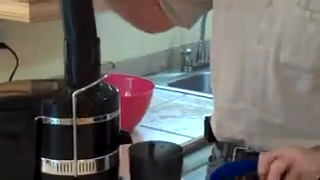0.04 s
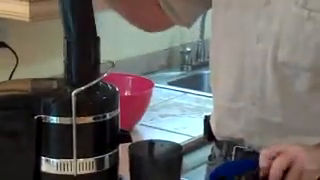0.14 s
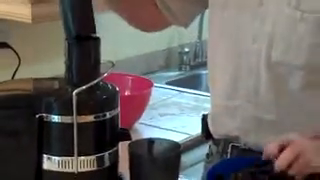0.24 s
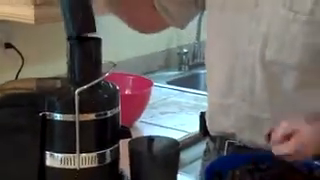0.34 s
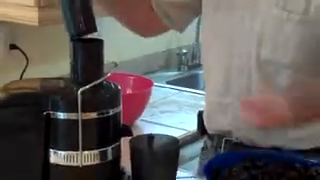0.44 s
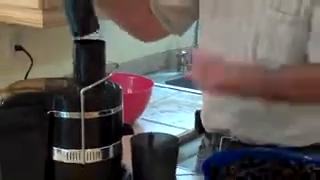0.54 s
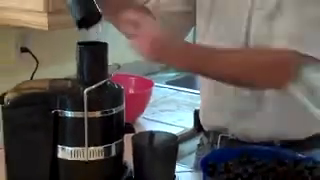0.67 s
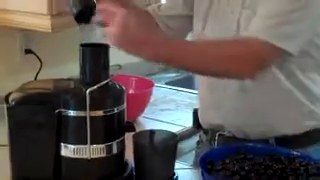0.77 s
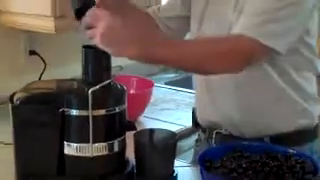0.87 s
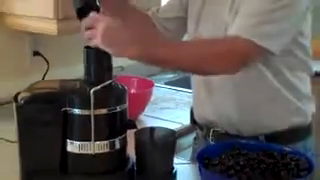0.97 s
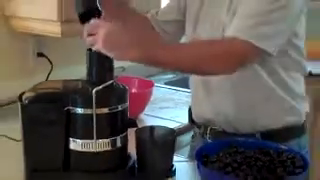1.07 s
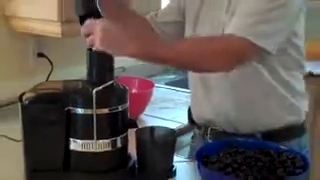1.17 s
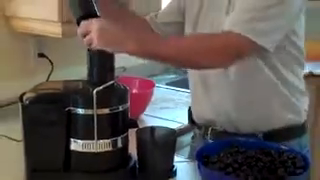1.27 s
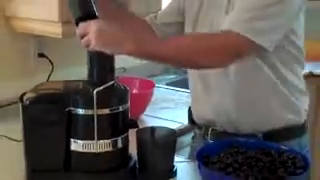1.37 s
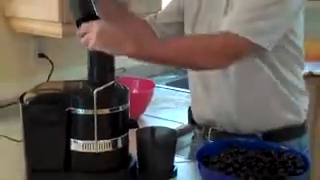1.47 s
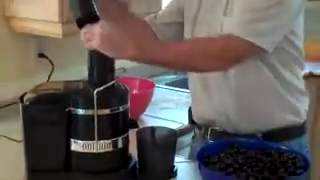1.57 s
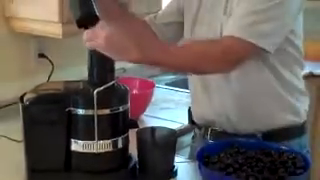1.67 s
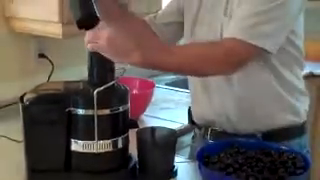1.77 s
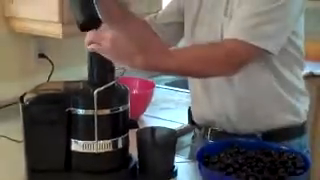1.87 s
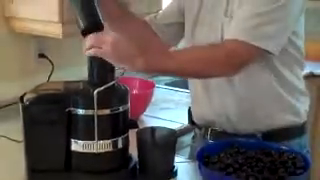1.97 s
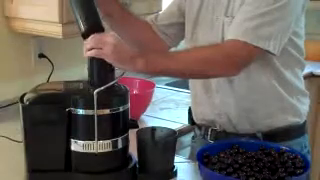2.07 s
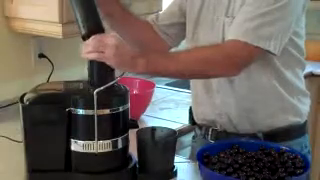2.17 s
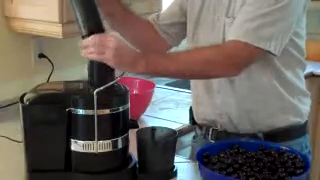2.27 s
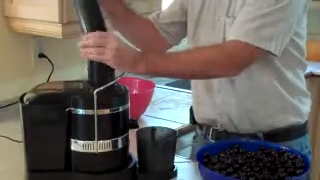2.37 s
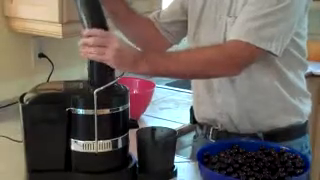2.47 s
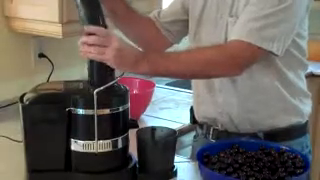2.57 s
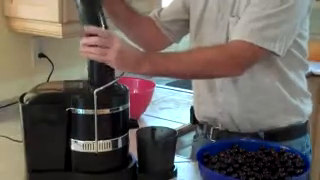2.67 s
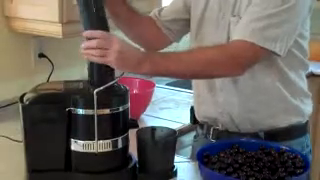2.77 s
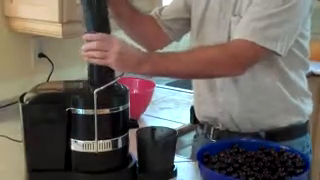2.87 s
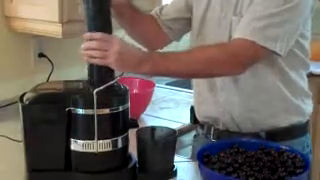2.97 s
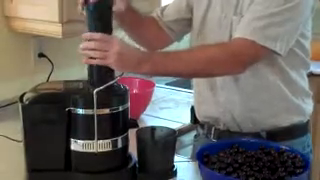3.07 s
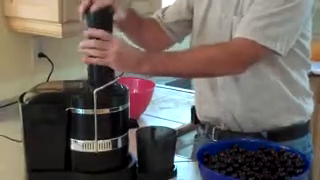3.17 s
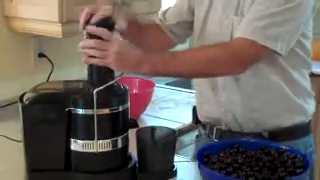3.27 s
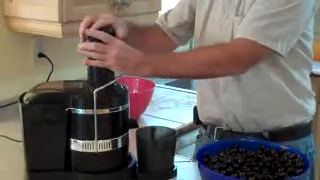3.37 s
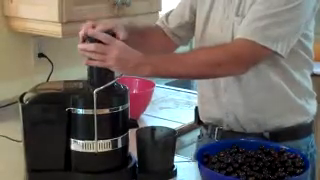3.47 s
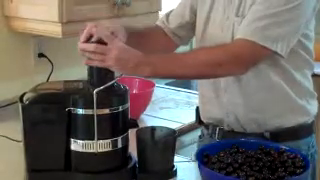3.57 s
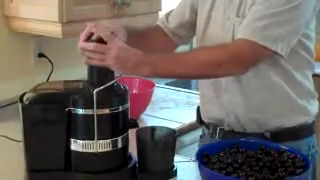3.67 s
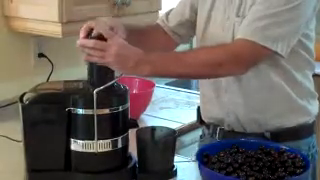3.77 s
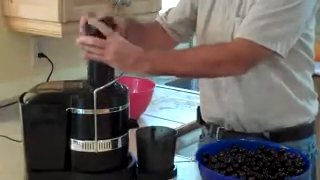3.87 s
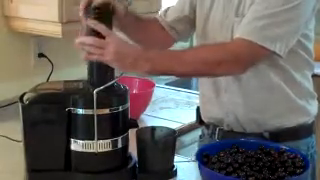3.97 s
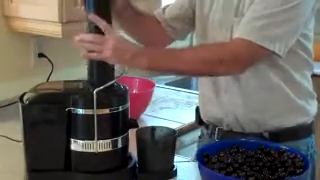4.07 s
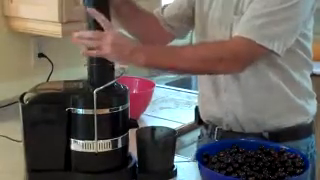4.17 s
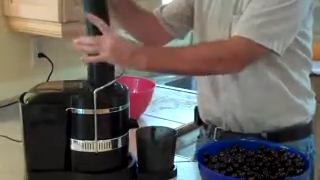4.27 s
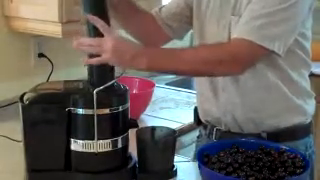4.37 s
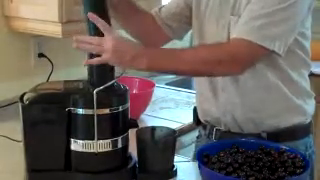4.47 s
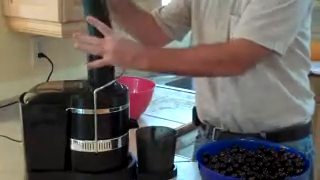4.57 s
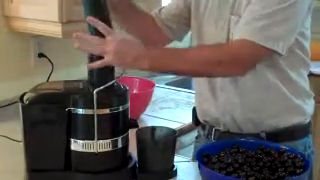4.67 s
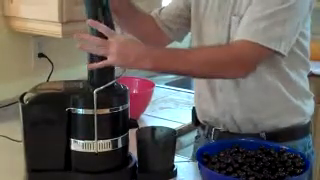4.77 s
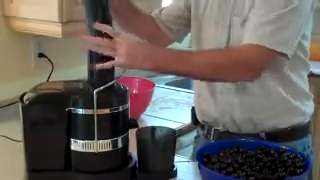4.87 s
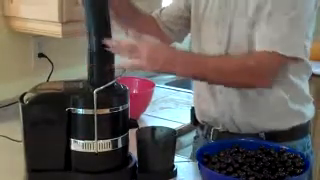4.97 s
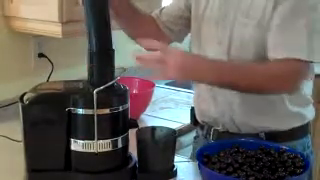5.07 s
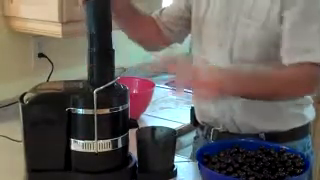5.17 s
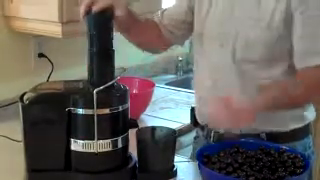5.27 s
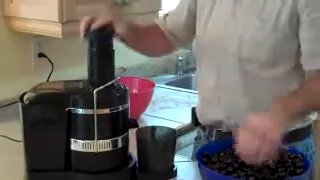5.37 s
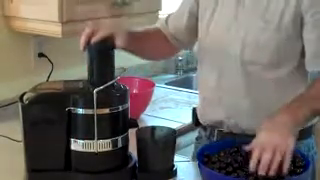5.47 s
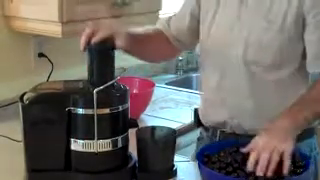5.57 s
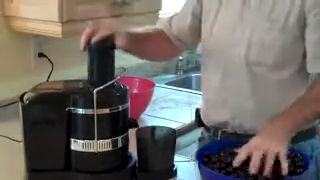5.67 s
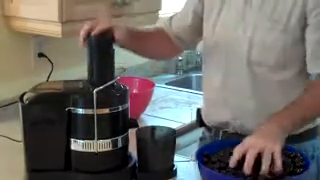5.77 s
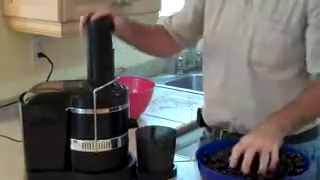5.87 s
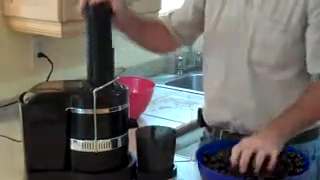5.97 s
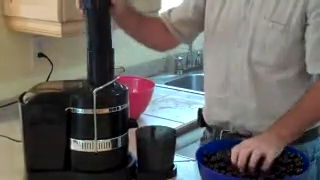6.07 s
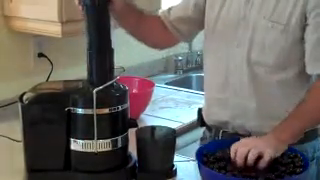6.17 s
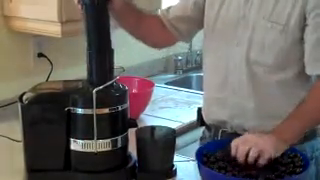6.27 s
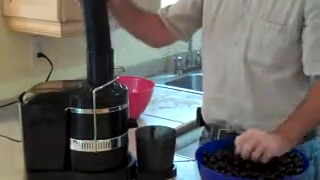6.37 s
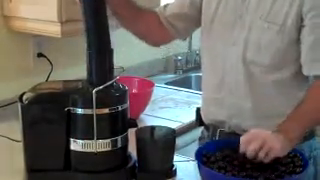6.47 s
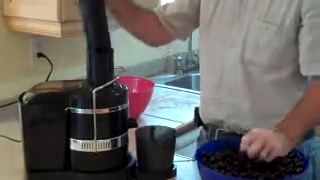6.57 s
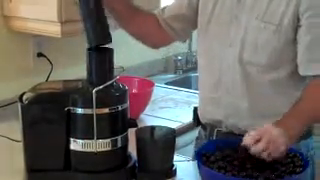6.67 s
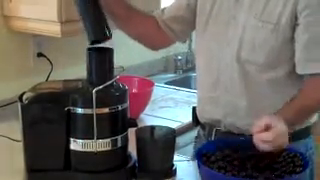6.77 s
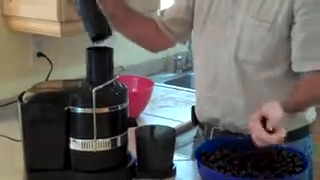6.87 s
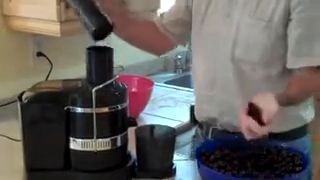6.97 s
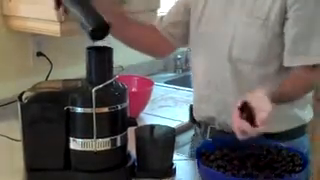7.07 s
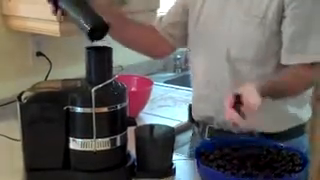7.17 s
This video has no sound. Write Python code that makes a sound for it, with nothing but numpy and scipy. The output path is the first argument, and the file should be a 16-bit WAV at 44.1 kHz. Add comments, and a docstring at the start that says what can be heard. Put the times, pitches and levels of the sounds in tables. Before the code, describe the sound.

An electric juicer hums, whines and hisses steadily while small fruit is pushed down and shredded in wet rasping bursts, with a hard plastic knock afterwards.

```python
"""A centrifugal juicer hums, whines and hisses on a kitchen counter, from sine tones and coloured noise.
Grapes drop down the chute and are shredded in sharp rasps, made of dense clicks that shake the housing.
Wet pulp thuds into the plastic housing as softer clicks, and the pusher knocks ringing modes in the chute.
A camera with two small microphone ports stands close by in the hard room, which adds noise-built echoes."""
import sys
import numpy as np
from scipy import signal
from scipy.fft import rfft, irfft, next_fast_len
from scipy.io import wavfile
from scipy.ndimage import uniform_filter1d

SR = 44100
rng = np.random.default_rng(int(sys.argv[2]) if len(sys.argv) > 2 else 0)


def store_pcm(level_fs):
    """Save levels as 16-bit WAV."""
    pcm = np.round(np.clip(level_fs, -1, 1) * 32767).astype(np.int16)
    wavfile.write(sys.argv[1], SR, np.atleast_2d(pcm).T)


N = 318843

SHAFT_HZ = 59.78  # turns per second without load
T = np.arange(N) / SR  # time in seconds
SIZE = next_fast_len(N + SR)  # room for one second of echoes
HZ = np.maximum(np.arange(SIZE // 2 + 1) * SR / SIZE, 1)


def undb(db):
    """Turn decibels into gain."""
    return 10 ** (np.asarray(db) / 20)


def curve(table):
    """Join the rows of a table by straight lines in time."""
    rows = np.array(table)
    return np.interp(T, rows[:, 0], rows[:, 1])


def across(table, hz):
    """Read a table between its rows, with pitch on a logarithmic axis."""
    rows = np.array(table)
    return np.interp(np.log(hz), np.log(rows[:, 0]), rows[:, 1])


def through(x, response):
    """Filter a sound by a frequency response."""
    return irfft(rfft(x, SIZE) * response, SIZE)[..., :N]


def unit(x):
    """Scale to an average strength (rms) of 1."""
    return x / np.sqrt(np.mean(np.abs(x) ** 2))


def colour(x, spectrum):
    """Give a white sound a spectrum, keeping its power."""
    return through(x, unit(undb(across(spectrum, HZ))))


def walk(rate):
    """Smooth random wandering with rms 1; rate is how many new values are drawn per second."""
    k = int(SR / rate)
    steps = np.repeat(rng.standard_normal(N // k + 1), k)
    smooth = uniform_filter1d(uniform_filter1d(steps, k), k)
    return unit(smooth[:N])


def clicks(rate, spread_db):
    """Dense tiny impacts of uneven size, rate per second on average, scaled to rms 1."""
    struck = rng.random(N) < rate / SR
    direction = np.sign(rng.standard_normal(N))
    size = undb(spread_db * np.clip(rng.standard_normal(N), -2, 2))
    return unit(struck * direction * size)


def later(x, seconds):
    """Delay an envelope."""
    return np.interp(T - seconds, T, x)


def bursts(rows, rise):
    """Envelope of (start s, dB, fall time s) bursts: each rises quickly and dies away exponentially."""
    power = np.zeros(N)
    for s, db, length in rows:
        start = int(s * SR)
        age = T[:min(SR // 2, N - start)]
        shape = (1 - np.exp(-age / rise)) * np.exp(-age / max(length, rise))
        power[start:start + len(age)] += (undb(db) * shape) ** 2
    return np.sqrt(power)


def motor(turns, waver_db=2, flutter_db=1.5, hum_jitter=0.3, whine_jitter=0.1):
    """Shaft harmonics that waver on their own, one strong whine and a thin bearing tone."""
    # Motor hum. Each row: multiple of the shaft speed, average level in dB.
    harmonics = [(1, -71.5), (2, -66.5), (3, -55), (4, -51.5), (5, -59), (6, -57), (8, -68), (10, -57),
                 (11, -62), (13, -61), (14, -62), (16, -60), (17, -57), (25, -75), (30, -58)]
    # The whine dips briefly. Each row: middle of the dip in seconds, depth in dB.
    whine_dips = [(1.13, 7), (3.32, 5), (6.39, 11)]
    dip_s = 0.091
    whine_order, whine_db = 15, -44.5  # multiple of the shaft speed, level outside the dips
    bearing_hz, bearing_db = 2745, -57

    def tone(phase, db, jitter):
        """A sine of rms level db, with a random starting phase that also wanders."""
        cycles = phase + rng.random()
        return np.sqrt(2) * undb(db) * np.sin(2 * np.pi * cycles + jitter * walk(14))

    hum = sum(tone(round(order) * turns, db + waver_db * walk(12), hum_jitter) for order, db in harmonics)
    dips = sum(depth * np.exp(-((T - s) / dip_s) ** 2) for s, depth in whine_dips)
    whine = tone(whine_order * turns, whine_db - dips + flutter_db * walk(12), whine_jitter)
    bearing = tone(bearing_hz * T, bearing_db + flutter_db * walk(4.93), whine_jitter)
    return hum + whine + bearing


def basket(turns, air_db=-37, spray_db=-5.5, throb=0.043):
    """The spinning basket rushes steadily with air, and its fine spray throbs once a turn."""
    # How the spray's hiss changes. Each row: time in seconds, level in dB before spray_db is added.
    hiss = [(0, -33), (1.45, -33.5), (3.4, -36), (4.35, -36.5), (4.7, -32.5), (6.2, -38.5), (6.6, -34),
            (7.2, -33.5)]
    # Tone colour of air and spray. Each row: frequency in Hz, relative level in dB.
    rush_spectrum = [(30, -14.5), (90, -9.5), (150, -8), (200, -4), (250, 5.5), (330, -2.5), (450, -4.5),
                     (620, -2.5), (1000, -2.5), (2000, -3.5), (4900, -5), (6100, 5), (7700, 7), (9500, -7),
                     (12000, -20.5)]
    air = rng.standard_normal(N) * undb(air_db + 0.49 * walk(12))
    spray = clicks(rate=5000, spread_db=4) * undb(curve(hiss) + spray_db + 0.81 * walk(27))
    throbbing = 1 + throb * np.sin(2 * np.pi * turns)
    return colour(air + spray * throbbing, rush_spectrum)


def shredding():
    """How hard the grater disc works: each batch is gripped, wears down steadily and is flung clear."""
    # Batches of fruit on the disc. Each row: start in seconds, length in seconds,
    # shredding level in dB before wear.
    batches = [(1.594, .23, -18), (1.909, 0.39, -22), (2.314, 0.64, -20.5), (3.04, 0.19, -33),
               (3.463, 0.043, -30.5), (4.768, .08, -32), (4.845, 0.053, -26.5), (4.937, 0.051, -28)]
    grip_s, wear_db_per_s, clear_s = 0.023, 21.5, 0.023
    power = 0
    for start, length, db in batches:
        age = np.maximum(T - start, 0)
        grip = np.minimum(age / grip_s, 1)
        clear = np.exp(-np.maximum(age - length, 0) / clear_s)
        power = power + (grip * undb(db - wear_db_per_s * age) * clear) ** 2
    return np.sqrt(power)


def bites(rows):
    """Envelope of (s, dB) bites: what is left of a grape is caught again, weaker, one turn later."""
    rise_s, fall_s, rebite_db = 0.0012, 0.008, -7
    first = bursts([(s, db, fall_s) for s, db in rows], rise=rise_s)
    again = undb(rebite_db) * later(first, 1 / SHAFT_HZ)
    return np.hypot(first, again)


def housing(force, favoured_hz=1000, favour_db=0, reach=0.17):
    """The plastic shell rings in its damped modes; where it is struck decides which ring most."""
    # Modes of the shell. Each row: frequency in Hz, width in Hz, relative level in dB.
    modes = [(283, 67, -7), (418, 25, -4.5), (599, 35, 3.5), (700, 54, -6), (834, 23, 2.5), (989, 53, 4),
             (1262, 93, -1), (1479, 45, 3.5), (1623, 77, -0.5), (2022, 89, -0.5), (2216, 100, -3),
             (2485, 82, 2), (2796, 39, -1), (3455, 120, -3), (4170, 37, -11)]
    response = 0
    for k, (hz, width, db) in enumerate(modes):
        closeness = np.exp(-(np.log(hz / favoured_hz) / reach) ** 2)
        gain = undb(db + favour_db * closeness)
        resonance = gain / (1 + 1j * (HZ ** 2 - hz ** 2) / (HZ * width))
        response = response + (-1) ** k * resonance  # neighbours move in opposite directions
    return through(force, unit(response))


def grater(turns, work, rasp_db=-5.5, crunch_db=2.5, shell_db=1.4, skin_shell_db=-9, chop=0.17, rough_db=2):
    """Rows of teeth tear the fruit in dense clicks: skins rasp, flesh crunches, both shake the housing."""
    # Single grapes caught by the teeth. Each row: time in seconds, then the rasp, crunch and housing
    # levels in dB, before rasp_db, crunch_db and shell_db are added.
    grapes = [(1.5237, -7.5, -42, -24.5), (1.5886, -11, -32, -28), (1.6444, -9.5, -28, -36),
              (1.7105, -3, -12.5, -20), (1.7852, 0, -12, -13.5), (2.004, -5.5, -14.5, -23.5),
              (2.0151, 0, -16, -25), (2.1144, -8.5, -19, -26), (2.14, -6.5, -22, -37),
              (2.212, -0.5, -30, -28), (2.363, -4, -30, -24), (2.373, 1, -20, -32), (2.4211, -5, -9.5, -25),
              (2.444, -6.5, -18, -25), (2.477, -13, -11.5, -23), (2.5722, -5, -11.5, -22.5),
              (2.6014, -14, -20, -34), (2.659, -6.5, -16.5, -19), (3.0424, -3.5, -13.5, -15.5),
              (3.0684, -11, -12, -15), (3.0839, -5, -15.5, -16), (3.488, 1.5, -20, -44),
              (4.7572, -2.5, -11, -20), (4.939, -8, -18, -22), (4.9744, -16, -22, -22)]
    # Teeth on skin. Each row: frequency in Hz, relative level in dB.
    rasp_spectrum = [(100, -48), (400, -22), (1000, -17), (2500, -13), (4200, -7.5), (5300, -3.5),
                     (6400, 1), (7800, 1), (9300, -10.5), (11500, -18), (12500, -38)]
    # Teeth on flesh. Each row: frequency in Hz, relative level in dB.
    crunch_spectrum = [(400, -38), (1500, -11), (3400, -0.5), (5000, 0.5), (6200, 10), (8000, -19),
                       (12000, -27)]
    teeth = 1 + chop * np.sin(2 * np.pi * 2 * turns)  # swells twice a turn
    skins = work * unit(undb(rough_db * walk(200)))  # scraps catch and slip
    rasp = bites([(s, db + rasp_db) for s, db, _, _ in grapes])
    crunch = bites([(s, db + crunch_db) for s, _, db, _ in grapes])
    shake = bites([(s, db + shell_db) for s, _, _, db in grapes])
    tearing = teeth * clicks(rate=7000, spread_db=4.5) * np.hypot(rasp, skins)
    crushing = teeth * clicks(rate=8000, spread_db=2.0) * crunch
    pounding = teeth * clicks(rate=5000, spread_db=4.0) * np.hypot(shake, skins * undb(skin_shell_db))
    return colour(tearing, rasp_spectrum) + colour(crushing, crunch_spectrum) + housing(pounding)


def pulp(work, length=0.039):
    """Small scraps and a few big soft lumps of wet pulp splatter on the housing as sparse clicks."""
    # Big lumps thrown against the housing. Each row: time in seconds, level in dB.
    thuds = [(1.53, -30), (1.759, -26.5), (1.82, -31.5), (2.12, -27), (2.48, -29), (2.61, -27),
             (2.725, -22), (3.09, -27), (4.856, -23), (4.96, -29)]
    # Pulp on plastic. Each row: frequency in Hz, relative level in dB.
    splat_spectrum = [(60, -51), (130, -25), (180, -3.5), (250, 8), (340, -5.5), (470, -7), (620, 0),
                      (1100, -9.5), (3000, -40)]
    splatter_db, flight_s = -17.5, 0.042  # scraps follow the shredding, this much weaker and later
    lumps = bursts([(s, db, length) for s, db in thuds], rise=0.0016)
    scraps = undb(splatter_db) * later(work, flight_s)
    return colour(clicks(rate=900, spread_db=4.5) * np.hypot(lumps, scraps), splat_spectrum)


def pusher(ring_db=21, chatter=0.012):
    """Each blow in the chute sets the housing ringing; the loose plastic chatters for an instant."""
    # Pusher strikes. Each row: time in seconds, ring level in dB before ring_db is added, crack level
    # in dB, frequency in Hz of the modes that the struck spot favours, their boost in dB.
    knocks = [(3.085, -19, -23, 1000, 15), (4.757, -18, -19.5, 1470, 12), (5.445, -8.5, -7, 700, 8),
              (6.44, -34.5, -48, 610, 16)]
    # Plastic on plastic. Each row: frequency in Hz, relative level in dB.
    crack_spectrum = [(40, -38), (150, -4), (400, 1.5), (850, 1), (2300, 3.5), (3300, -7.5), (6300, 0),
                      (9000, -10), (12500, -35)]
    ring = 0
    for s, db, _, hz, favour_db in knocks:
        blow = signal.unit_impulse(N, int(s * SR))
        ring = ring + undb(db + ring_db) * housing(blow, hz, favour_db)
    crack_envelope = bursts([(s, db, chatter) for s, _, db, _, _ in knocks], rise=0.00016)
    crack = clicks(rate=13000, spread_db=3.5) * crack_envelope
    return ring + colour(crack, crack_spectrum)


def echoes(early_db=-2, late_db=-0.5, early_s=0.012):
    """One stereo path through the kitchen: quick reflections from counter and cupboards, then the tail."""
    # Fading of the room. Each row: frequency in Hz, time in seconds for the tail to drop by 60 dB.
    room_t60 = [(150, 0.52), (700, 0.64), (2500, 0.78), (7000, 0.58), (12000, 0.48)]
    # Likeness of left and right echoes. Each row: frequency in Hz, likeness from 0 to 1.
    likeness = [(100, 0.88), (300, 0.96), (650, 0.85), (1200, 0.62), (2500, 0.27), (4500, 0.074), (8000, 0)]
    age, hz = T[:SR], np.maximum(np.arange(SR // 2 + 1), 1)
    alike = np.clip(across(likeness, hz), 0, 1)
    mid, side = rfft(rng.standard_normal((2, SR)))
    opposite = np.array([[1], [-1]])  # left and right
    field = mid * np.sqrt((1 + alike) / 2) + opposite * side * np.sqrt((1 - alike) / 2)
    early = undb(early_db) * unit(np.exp(-age / early_s) * (1 - np.exp(-age / 0.00037)))
    response = 0
    for k, (_, t60) in enumerate(room_t60):
        # Neighbouring bands blend into each other.
        share = across([(f, j == k) for j, (f, _) in enumerate(room_t60)], hz)
        fade = np.exp(-np.log(1000) * age / t60)
        late = undb(late_db) * unit(fade * (1 - np.exp(-age / 0.0067)))
        response = response + irfft(field * share, SR) * np.hypot(early, late)
    return rfft(response, SIZE) / np.sqrt(SR)


def kitchen(x, direct_db=-3.5, room_db=-3, wander=45, count=6):
    """The sound arrives directly and through several echo paths whose shares wander randomly."""
    shares = np.array([walk(wander) for _ in range(count)])
    shares /= np.sqrt(np.sum(shares ** 2, axis=0))  # together they keep constant power
    room = sum(through(x * share, echoes()) for share in shares)
    return undb(direct_db) * x + undb(room_db) * room


def scene():
    """The shaft slows a little under load; its turns time the motor, basket and teeth."""
    sag = 0.00397  # share of the shaft speed lost under full load
    full_load_db = -19.5  # shredding level that loads the motor fully
    work = shredding()
    load = np.minimum(work / undb(full_load_db), 1)
    drift = 0.00052 * walk(4.7)
    turns = np.cumsum(SHAFT_HZ * (1 - sag * load + drift)) / SR
    # The motor's tones stay dry; all other juicer noises also reach the room.
    noises = basket(turns) + grater(turns, work) + pulp(work) + pusher()
    return motor(turns) + undb(2.5) * kitchen(noises)


def record(dry):
    """Each port colours the treble in its own way; the loudest peaks overload; the top is cut."""
    # The two ports ring at different pitches. Each row: frequency in Hz, left minus right in dB.
    port_difference = [(2000, -0.1), (3800, -0.6), (5200, -0.5), (6300, -5.5), (7000, 5), (7800, 12.5),
                       (9000, 8.5), (12000, 13.5)]
    top_hz = 12100
    ratio = undb(across(port_difference, HZ))
    ports = np.array([ratio, np.ones_like(ratio)]) * np.sqrt(2 / (1 + ratio ** 2))  # keeps total power
    limited = np.clip(through(dry, ports), -1.1, 1.1)
    top_cut = signal.ellip(8, .2, 70, top_hz, fs=SR, output="sos")
    return signal.sosfilt(top_cut, limited)


dry = scene()
out = record(dry)
store_pcm(out)
```